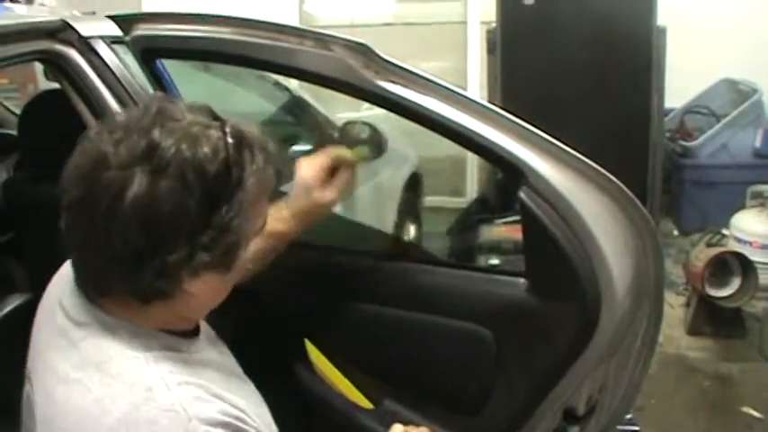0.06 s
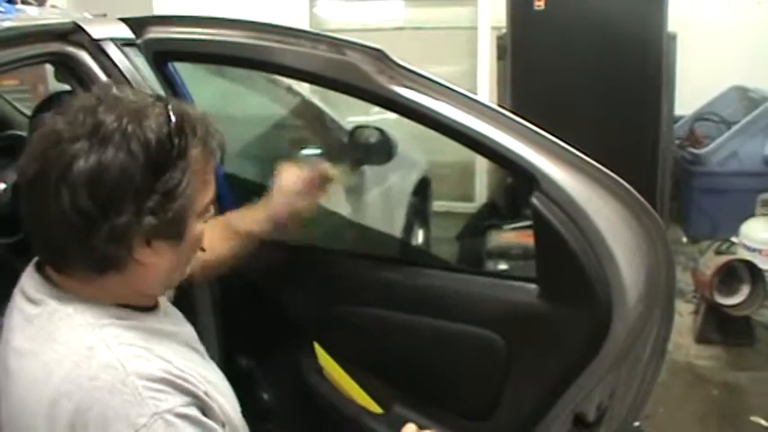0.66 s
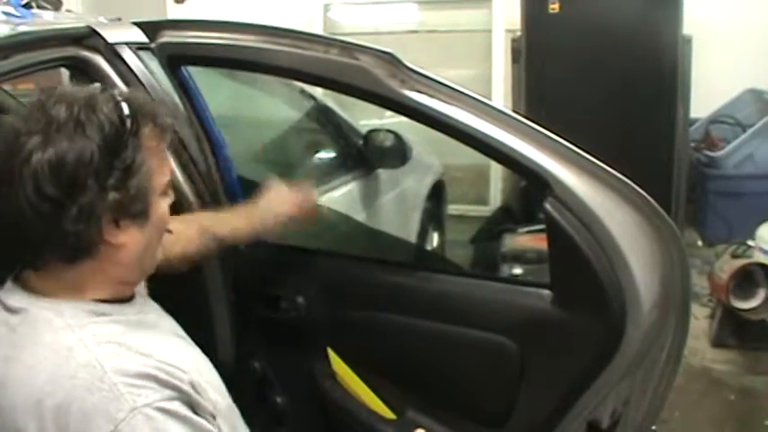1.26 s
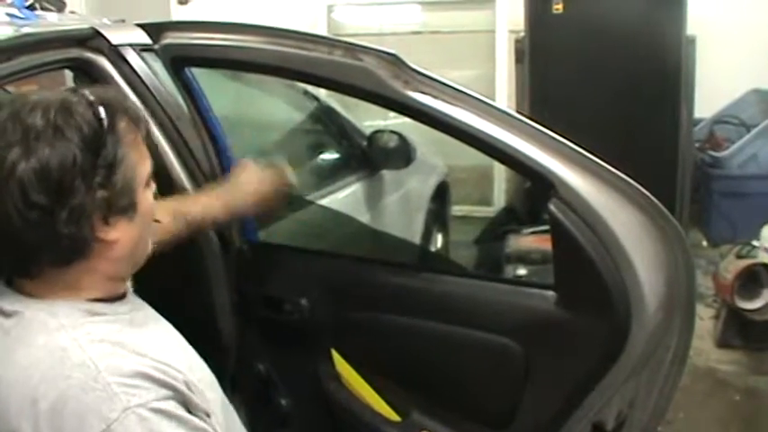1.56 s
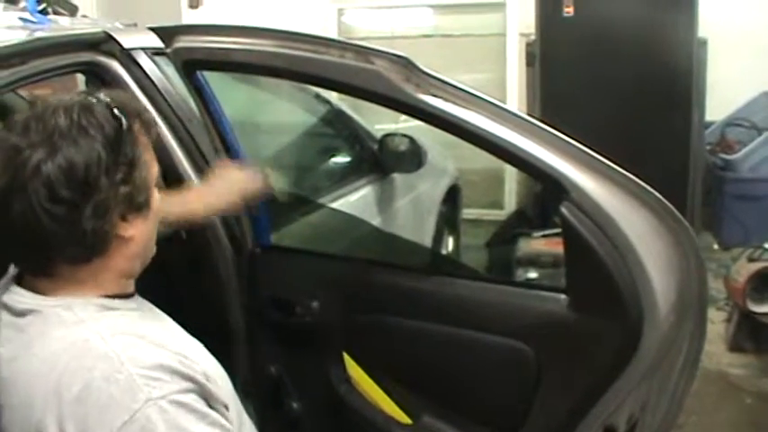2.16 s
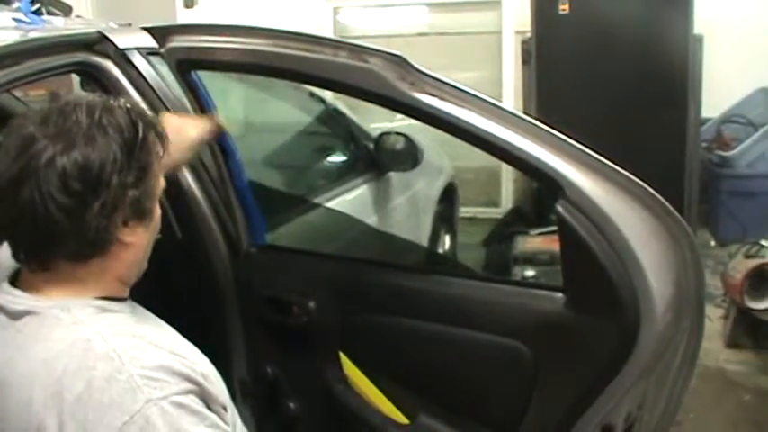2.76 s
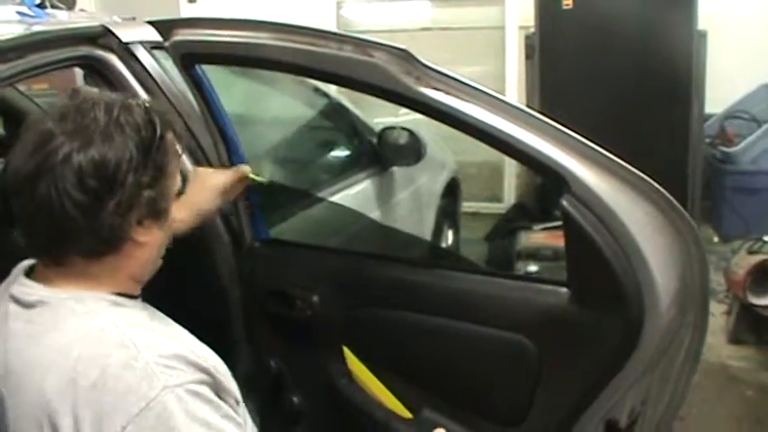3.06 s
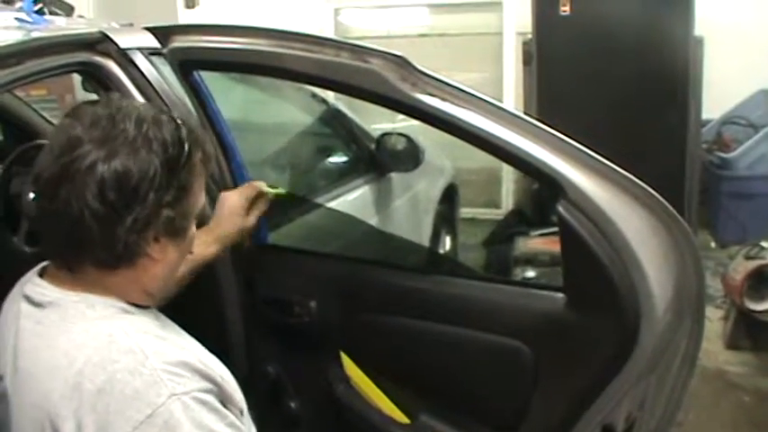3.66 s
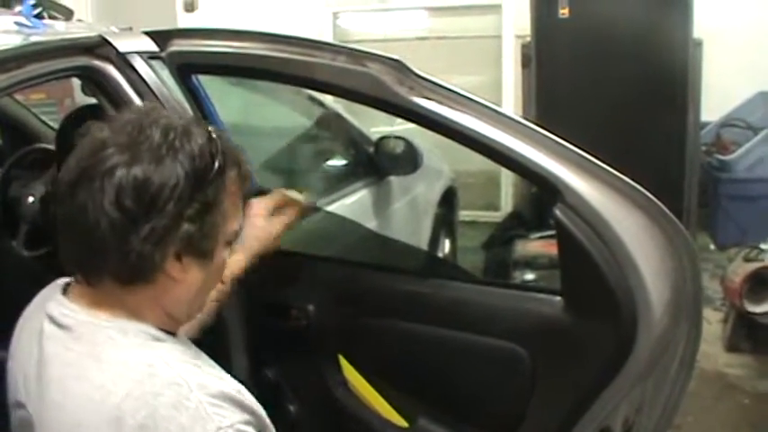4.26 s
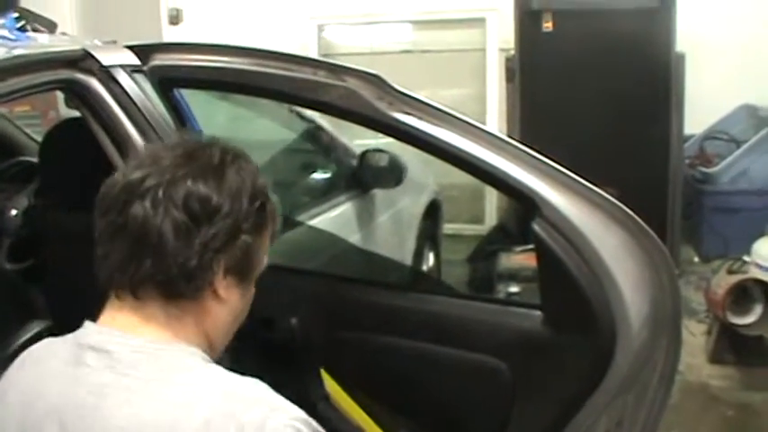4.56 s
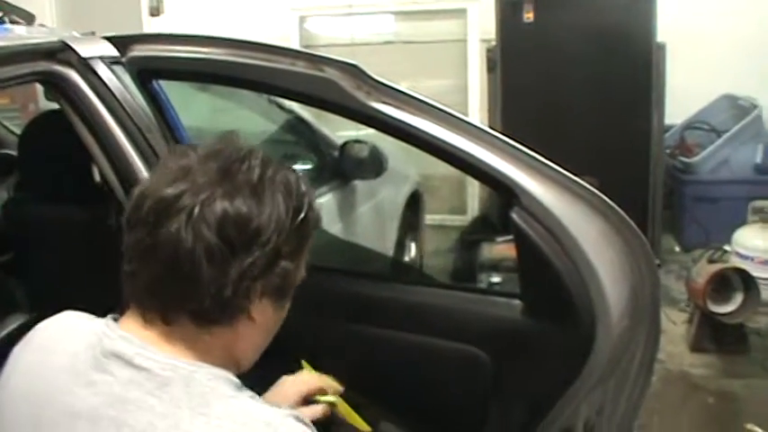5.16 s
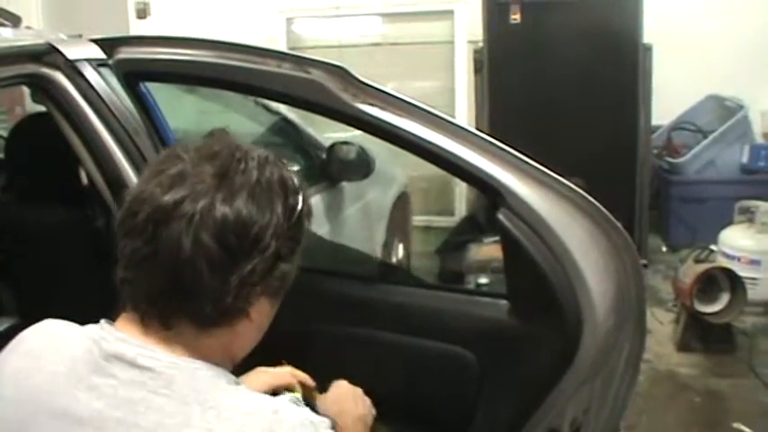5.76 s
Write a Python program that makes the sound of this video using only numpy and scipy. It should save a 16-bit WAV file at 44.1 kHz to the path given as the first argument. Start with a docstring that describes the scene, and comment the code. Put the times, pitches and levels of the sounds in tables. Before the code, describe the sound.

A pad scrubs a wet car window in quick strokes, each slapping the glass with a watery swish and a slight thump from the door. The strokes lighten, and tiny water spurts and scuffs follow along the edge. A second firm run grows duller, then a shirt rustles and plastic tools knock against the door. The sounds are close and in front, in a mildly echoing garage with steady hum and hiss.

```python
"""A wet car door window is scrubbed in a garage, over steady hum and hiss.
0-2.4 s: quick strokes, firm then light. The pad slaps, pane and door ring, the water film swishes.
From 1.2 s water spurts at the window's edge; at 2.5-3.3 s the pad scuffs along it.
3.2-4.2 s: a second run of strokes, the slaps growing duller.
From 4.2 s a shirt rustles; from 4.5 s plastic tools knock against the door."""
import sys
import numpy as np
from scipy import signal
from scipy.fft import rfft, irfft
from scipy.io import wavfile
from scipy.ndimage import uniform_filter1d

SR = 44100
rng = np.random.default_rng(int(sys.argv[2]) if len(sys.argv) > 2 else 0)


def waveform_to_disk(signal):
    """Save audio, clipped to [-1, 1], as 16-bit WAV at the path in sys.argv[1]."""
    frames = np.transpose(np.atleast_2d(signal))
    scaled = np.clip(frames, -1, 1) * 32767
    samples = np.round(scaled).astype(np.int16)
    wavfile.write(sys.argv[1], SR, samples)


N = 260631
T = np.arange(int(.5 * SR)) / SR  # time within one event, s

# pad strokes: start_s, slap_db, squareness (0-1), swish_rel_db, knock_centre_hz, thump_centre_hz
PAD_STROKES = [ (-.034, -16, 1, -38.5, 740, 128), (.1807, -19, 0.7, -41, 477, 226),
               (0.3987, -19.5, 0.39, -48, 1300, 226), (0.6177, -16.5, 0.15, -31, 820, 170),
               (.840, -16, 0.37, -33, 1300, 128), (1.0768, -17, 0, -45, 700, 128),
               (1.3371, -20, 0.53, -43, 735, 226), (1.6206, -39, 0.31, -60, 716, 128),
               (1.812, -47, 0.85, -64, 710, 226), (1.9234, -35.5, 0.35, -57.5, 720, 170),
               (2.228, -39, 0.85, -54, 500, 256), (2.423, -42.5, 0.56, -75, 536, 256),
               (3.1943, -20, 0.85, -40, 540, 347), (3.406, -20, 0.87, -45.5, 840, 347),
               (3.597, -17, 0.34, -43, 1500, 347), (3.7961, -19, 0, -40, 2200, 128),
               (3.9772, -20, 0.24, -64, 650, 226), (4.174, -33, 0.87, -57, 1295, 128)]
# glass bending, damped by the pad: pitch_hz, gain_db, t60_s
GLASS_MODES = [(390, -4.5, 0.17), (474.4, -10.5, 0.24), (581, -2.5, 0.082), (649.7, -1, 0.094),
               (709, 4.5, 0.045), (774, -1, 0.08), (873, 5.5, 0.038), (1128, 1.5, 0.031),
               (1307, 7.5, 0.019), (1550, 8.5, 0.01), (1880, 0, 0.037), (2260, 6.5, 0.012)]
# pane and door flexing as a whole: pitch_hz, gain_db, t60_s
DOOR_FLEX_MODES = [(86.1, -4, 0.52), (100.8, 1.5, 0.25), (128.1, 0, 0.29), (171.5, 3, 0.16), (227, 3, 0.16),
                   (256, -5, 0.19), (346, -4.5, 0.3)]
# first contact: freq_hz, gain_db
SLAP_SPECTRUM = [(40, -19), (130, -4.5), (500, -8.5), (1300, -1), (2200, 1.5), (2800, -1), (3600, 3),
                 (5300, -0.5), (7700, 0), (9500, -2.5), (11500, -0.5), (16000, -15.5)]
# sheared water film: freq_hz, gain_db
SWISH_SPECTRUM = [(200, -28), (700, 7.5), (3900, 8), (5700, -0.5), (8500, -3.5), (12000, -10.5),
                  (16000, -28)]
# pad grazing the glass: freq_hz, gain_db
BRUSH_SPECTRUM = [(80, -9), (200, 2), (800, 1), (1300, -14.5), (12000, -26.5)]
# short hisses and clicks at the glass (water spurts, one rasping pad scuff, one sharp click):
# start_s, length_s, level_db, resonance_hz
HISSES_AND_CLICKS = [ (1.229, 0.012, -35, 7000), (1.786, 0.0058, -40.5, 6100), (2.242, 0.0025, -30, 9900),
                     (2.249, 0.0059, -29.5, 10300), (2.265, 0.01, -30, 9000), (2.275, 0.0078, -25.5, 9000),
                     (2.397, 0.0064, -32.5, 4400), (2.662, 0.037, -39, 2800), (2.924, 0.025, -26, 7600),
                     (3.003, 0.022, -31, 7700), (3.021, .024, -24, 7500), (3.172, .017, -20, 6900),
                     (3.242, .022, -20, 10400), (3.386, 0.0026, -25, 11500), (3.389, 0.0083, -26, 10800),
                     (3.46, .005, -29.5, 11200), (3.944, 0.02, -44, 6200), (3.988, .003, -31.5, 7050)]
# pad along the wet edge: start_s, length_s, level_db, treble_db
EDGE_SCUFFS = [ (2.514, 0.05, -38.5, -6), (2.572, 0.059, -40.5, 5), (2.633, 0.11, -33, -0.5),
               (2.797, 0.12, -36.5, 3), (2.834, 0.17, -36.5, -2.5), (3.264, 0.051, -33, -0.5)]
# wet ticks on the glass: start_s, level_db, pitch_hz
WET_TICKS = [(3.781, -31, 4580), (4.3928, -35.5, 3040)]
# fine droplets: freq_hz, gain_db
SPRAY_SPECTRUM = [(100, -12), (300, 6), (800, 1), (1700, -3.5), (3200, 4), (5000, 1), (8000, 1.5),
                  (11000, 4), (13200, -2), (16000, -6.5)]
# tools against the door: start_s, click_db, knock_db, thump_db
TOOL_HITS = [ (4.481, -46, -44, -59.5), (4.5377, -38, -37.5, -52), (5.279, -66, -45.5, -45),
             (5.396, -63, -46.5, -44), (5.643, -41, -39, -46.5), (5.6864, -36.5, -28, -48),
             (5.697, -41, -31, -46.5), (5.85, -47.5, -59, -79)]
# hollow plastic tool: pitch_hz, gain_db, t60_s
PLASTIC_MODES = [(760, 8.5, 0.02), (870, 1.5, 0.026), (1025, -0.5, 0.032), (1387, -4, 0.022),
                 (1780, -4, 0.017), (1960, -5, 0.019)]
# shirt movement: time_s, gain_db
SHIRT_ENVELOPE = [(4.178, -74), (4.29, -53.5), (4.4, -59.5), (4.76, -80), (4.83, -52.5), (4.902, -66),
                  (5.076, -45.5), (5.166, -61), (5.296, -51.5), (5.352, -79), (5.378, -52), (5.5, -104)]
# rubbing cloth: freq_hz, gain_db
CLOTH_SPECTRUM = [(150, -11), (800, -2), (3800, -12), (8900, -9), (16000, -23.5)]
# garage reverb: freq_hz, echo_db, t60_s, left_right_likeness (0-1)
GARAGE_BANDS = [(80, -11, 0.36, 1), (280, -5.5, 0.31, 0.78), (630, -3, 0.31, 0.37),
                (1380, -3.5, 0.48, 0.36), (3840, -7, 0.74, 0.04), (6800, -4.5, .46, .02),
                (14800, -20, 0.34, 1)]
# workshop hum and hiss: freq_hz, gain_db
AIR_SPECTRUM = [(20, -15), (53, -7), (96, -0.5), (319, -14.5), (976, -16), (5500, -28), (9500, -27),
                (16000, -34)]
# its stereo side, relative to the mid: freq_hz, gain_db
AIR_SIDE_SPECTRUM = [(30, -27), (100, -36), (700, -6.0), (3000, -1.0), (10000, -9)]
# direct path to each ear: freq_hz, gain_db
LEFT_SPECTRUM = [(1200, 0.11), (4500, 0.38), (9000, 0.6)]
RIGHT_SPECTRUM = [(1200, 0.2), (4500, -3.5), (9000, -2.2)]

KNOCK_REL_DB, THUMP_REL_DB, SLAP_TREBLE_DB = (-11.5, .5), (-12, -1.5), (-6, 3)  # (glancing, square)
PIVOT_DB, TREBLE_DB_PER_DB = -38, -0.19  # slaps above the pivot are duller
DRYING_START_S, DRYING_DB_PER_S = 3.35, 12.5  # later slaps lose treble
BRUSH_END_S, BRUSH_LEAD_S, BRUSH_REL_DB = 1.2, .02, -19.5
DRIBBLE_REL_DB, DRIBBLE_S, SLOSH_REL_DB = -29, 0.015, -9


def scrubbing():
    """Pad strokes as (blows, glides); a square landing knocks and thumps harder and slaps brighter."""
    blows, glides = np.zeros(N), np.zeros(N)
    for start_s, db, squareness, swish_db, knock_hz, thump_hz in PAD_STROKES:
        knock_db = db + np.interp(squareness, (0, 1), KNOCK_REL_DB)
        thump_db = db + np.interp(squareness, (0, 1), THUMP_REL_DB)
        treble_db = np.interp(squareness, (0, 1), SLAP_TREBLE_DB)
        treble_db += TREBLE_DB_PER_DB * (db - PIVOT_DB)
        treble_db -= DRYING_DB_PER_S * max(start_s - DRYING_START_S, 0)
        knock = pane_knock(knock_db, knock_hz)
        add(blows, start_s, slap(db, treble_db) + knock + thump(thump_db, thump_hz))
        add(glides, start_s, swish(swish_db))
        if start_s < BRUSH_END_S:
            add(blows, start_s - BRUSH_LEAD_S, brush(db + BRUSH_REL_DB))
    return blows, glides


def slap(db, treble_db, crackle=0.52, crackle_s=.0008, splash=0.21, splash_s=0.0057):
    """First contact: an impulse with crackle and splash; glass carries highs ahead of lows."""
    envelope = crackle * np.exp(-T / crackle_s) + splash * np.exp(-T / splash_s)
    push = rng.standard_normal(len(T)) * envelope
    push[0] += 1
    dispersed = signal.sosfilt([[-.6, 1, 0, 1, -.6, 0]] * 8, whiten(push))  # all-pass chain
    return level(colour(dispersed, SLAP_SPECTRUM, treble_db, shelf_hz=3200), db, 0, .004)


def pane_knock(db, centre_hz, rise_s=.0005):
    """The struck glass rings briefly in its bending modes."""
    glass = ring(GLASS_MODES, scatter_db=1.0, detune=0.0053, centre_hz=centre_hz, focus_db=7)
    return level(glass * (1 - np.exp(-T / rise_s)), db, 0, .025)


def thump(db, centre_hz=None, rise_s=0.0042, shudder=0.4, shudder_t60_s=0.31):
    """The heavy door takes milliseconds to start swinging; its trim shudders with it."""
    swing = ring(DOOR_FLEX_MODES, scatter_db=1.0, detune=0.0026, centre_hz=centre_hz, focus_db=2)
    trim = band_noise(110, 350) * undb(-60 * T / shudder_t60_s)
    door = level(swing, 0, 0, .06) + shudder * level(trim, 0, 0, .06)
    door *= 1 - np.exp(-(T / rise_s) ** 2)
    low_cut = signal.butter(2, 95, "high", fs=SR, output="sos")  # too small to radiate deep bass
    return level(signal.sosfilt(low_cut, door), db, .005, .06)


def swish(db, rise_s=0.005, glide_s=0.037, t60_s=0.39):
    """The pad shears the water film, glides and slows."""
    speed = (1 - np.exp(-T / rise_s)) * undb(-60 * np.maximum(T - glide_s, 0) / t60_s)
    shear = colour(grit(len(T), spread_db=2.5), SWISH_SPECTRUM)
    return level(shear * speed, db, .025, .09)


def brush(db):
    """A dull rub: the pad grazes the glass before it lands."""
    rub = rng.standard_normal(len(T)) * (T < BRUSH_LEAD_S)
    return level(colour(rub, BRUSH_SPECTRUM), db, 0, BRUSH_LEAD_S)


def wet_glass():
    """Water and pad at the glass: short hisses and clicks, broad scuffs, dull ticks."""
    out = np.zeros(N)
    for start_s, length_s, db, resonance_hz in HISSES_AND_CLICKS:
        add(out, start_s, hiss_burst(length_s, db, resonance_hz, dribble=undb(DRIBBLE_REL_DB)))
    for start_s, length_s, db, treble_db in EDGE_SCUFFS:
        add(out, start_s, scuff(length_s, db, treble_db))
    for start_s, db, pitch_hz in WET_TICKS:
        add(out, start_s, hiss_burst(length_s=0.0046, db=db, resonance_hz=pitch_hz, treble_db=-24.5))
    return out


def hiss_burst(length_s, db, resonance_hz, treble_db=0, dribble=0, q=2.7):
    """A spurt, rasp or click: droplet noise through a resonant high-pass, with broad slosh."""
    edge_s = 0.000455 + 0.22 * length_s  # long bursts start and stop more gently
    after_s = np.maximum(T - length_s, 0)
    tail = np.maximum(np.exp(-after_s / edge_s), dribble * np.exp(-after_s / DRIBBLE_S))
    envelope = np.clip(T / edge_s, 0, 1) * tail
    hiss, slosh = (colour(droplets() * envelope, SPRAY_SPECTRUM, treble_db) for _ in range(2))
    omega = 2 * np.tan(np.pi * resonance_hz / SR)
    hiss = signal.lfilter(*signal.bilinear([1, 0, 0], [1, omega / q, omega * omega]), hiss)
    burst = level(hiss, 0, 0, length_s) + level(slosh, SLOSH_REL_DB, 0, length_s)
    return level(burst, db, 0, length_s)


def scuff(length_s, db, treble_db, skew=.75, crackle_db=4.5):
    """The pad drags through water, swelling and easing; it catches every few milliseconds."""
    progress = np.clip(T / length_s, 0, 1)
    speed = np.abs(np.sin(np.pi * progress ** skew)) ** 0.91
    catches = flutter(crackle_db, step_samples=200)
    return level(colour(droplets() * speed * catches, SPRAY_SPECTRUM, treble_db), db, 0, length_s)


def droplets():
    """Gritty water hiss, sputtering from one millisecond to the next."""
    return flutter(spread_db=2.5, step_samples=60) * grit(len(T), spread_db=-0.5)


def tools(chatter=0.31, chatter_s=0.011, rise_s=.004):
    """Hollow plastic clicks, rings and chatters against the door, which thumps."""
    out = np.zeros(N)
    for start_s, click_db, knock_db, thump_db in TOOL_HITS:
        body = ring(PLASTIC_MODES, scatter_db=-3.0, detune=0.019, centre_hz=913, focus_db=1)
        rub = band_noise(500, 1700) * np.exp(-T / chatter_s)
        plastic = level(body, 0, 0, .025) + chatter * level(rub, 0, 0, .025)
        knock = level(plastic * (1 - np.exp(-T / rise_s)), knock_db, 0, .025)
        add(out, start_s, slap(click_db, treble_db=-4) + knock + thump(thump_db))
    return out


def shirt():
    """Cloth rustles as the body bends down."""
    time_s, gain_db = np.transpose(SHIRT_ENVELOPE)
    movement = undb(np.interp(np.arange(N) / SR, time_s, gain_db, left=-120, right=-120))
    cloth = colour(grit(N, spread_db=4.0), CLOTH_SPECTRUM)
    return level(cloth, 5.5) * movement


def garage(x, first_echo_s=0.0038, build_s=0.0053):
    """Dense stereo echoes, decaying per quarter-octave band; the bass is alike at both ears."""
    points_hz, echo_db, t60_s, likeness = np.transpose(GARAGE_BANDS)
    hz = np.fft.rfftfreq(len(T), 1 / SR)
    noise = rfft(rng.standard_normal((2, len(T))))
    onset = np.clip((T - first_echo_s) / build_s, 0, 1)
    response = 0
    for centre_hz in 45 * 2 ** np.arange(0, 8.75, .25):
        inside = (hz >= centre_hz / 2 ** .125) & (hz < centre_hz * 2 ** .125)
        decay = undb(-60 * T / log_interp(centre_hz, points_hz, t60_s))
        band = irfft(noise * inside, len(T)) * onset * decay
        mid, side = band * np.sqrt(inside.mean() / np.sum(band ** 2, axis=1, keepdims=True))
        alike = np.clip(log_interp(centre_hz, points_hz, likeness), 0, 1)
        pair = stereo(mid * np.sqrt((1 + alike) / 2), side * np.sqrt((1 - alike) / 2))
        response += undb(log_interp(centre_hz, points_hz, echo_db)) * pair
    return signal.fftconvolve(x[None], response, axes=1)[:, :N]


def shop_air():
    """Steady workshop hum and hiss, wider in the midrange than in the bass."""
    mid, side = (level(colour(rng.standard_normal(N), AIR_SPECTRUM), -52.4) for _ in range(2))
    return stereo(mid, colour(side, AIR_SIDE_SPECTRUM))


def ring(modes, scatter_db, detune, centre_hz, focus_db):
    """Decaying modes; each blow hits another spot and favours those near centre_hz, if given."""
    hz, db, t60_s = np.transpose(modes)[:, :, None]
    size, shift, phase = rng.standard_normal((3, len(modes), 1))
    if centre_hz:
        db = db + focus_db / (1 + (np.log2(hz / centre_hz) / 0.19) ** 2)
    waves = np.sin(2 * np.pi * (hz * (1 + detune * shift) * T + phase))
    return np.sum(undb(db + scatter_db * size - 60 * T / t60_s) * waves, axis=0)


def grit(count, spread_db):
    """Noise in 16-sample grains of random size."""
    sizes = np.repeat(undb(spread_db * rng.standard_normal(count)), 16)[:count]
    return rng.standard_normal(count) * sizes


def flutter(spread_db, step_samples):
    """Gain gliding between random values."""
    knots_s = T[::step_samples]
    return undb(spread_db * np.interp(T, knots_s, rng.standard_normal(len(knots_s))))


def band_noise(low_hz, high_hz):
    """Band-passed noise, one event long."""
    band = signal.butter(2, [low_hz, high_hz], "band", fs=SR, output="sos")
    return signal.sosfilt(band, rng.standard_normal(len(T)))


def whiten(x, smooth_hz=800):
    """Flatten a burst's broad resonances so it has no pitch."""
    hz = np.fft.rfftfreq(len(x), 1 / SR)
    power = uniform_filter1d(np.abs(rfft(x)) ** 2, int(smooth_hz / hz[1]))
    return colour(x, np.column_stack([hz, -10 * np.log10(power)])[1:])


def colour(x, spectrum, treble_db=0, shelf_hz=6500, size=4096):
    """Minimum-phase filter: a spectrum plus a treble shelf."""
    hz = np.fft.rfftfreq(size, 1 / SR)
    shelf_db = treble_db * hz ** 4 / (hz ** 4 + shelf_hz ** 4)
    db = log_interp(hz, *np.transpose(spectrum)) + shelf_db
    cepstrum = irfft(np.log(undb(db)))
    cepstrum[1:size // 2] *= 2
    cepstrum[size // 2 + 1:] = 0
    return signal.fftconvolve(x, irfft(np.exp(rfft(cepstrum))))[:len(x)]


def log_interp(hz, points_hz, values):
    """Interpolate on a log-frequency axis."""
    return np.interp(np.log(np.maximum(hz, 1)), np.log(points_hz), values)


def undb(db):
    """Decibels to gain."""
    return 10 ** (np.asarray(db) / 20)


def level(x, db, start_s=0, end_s=None):
    """Scale x to an rms level between two times."""
    part = x[int(start_s * SR):None if end_s is None else int(end_s * SR)]
    return x * undb(db) / np.sqrt(np.mean(part ** 2))


def add(out, start_s, x):
    """Mix x into out, cut at both ends."""
    i = int(round(start_s * SR))
    x, i = x[max(-i, 0):], max(i, 0)
    out[i:i + len(x)] += x[:len(out) - i]


def stereo(mid, side):
    """Mid and side to left and right."""
    return np.array([mid + side, mid - side])


def scene():
    """Sources in front, a little brighter on the left; the swish spreads more into the room."""
    blows, glides = scrubbing()
    near = blows + wet_glass() + tools() + shirt()
    direct = near + undb(3.5) * glides
    ears = np.array([colour(direct, LEFT_SPECTRUM), colour(direct, RIGHT_SPECTRUM)])
    return ears + garage(near + undb(4.5) * glides) + shop_air()


def record(dry, cutoff_hz=16000):
    """Steep low-pass."""
    return signal.sosfilt(signal.ellip(10, .2, 80, cutoff_hz, fs=SR, output="sos"), dry)


dry = scene()
out = record(dry)
waveform_to_disk(out)
```